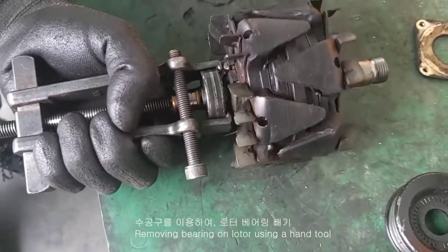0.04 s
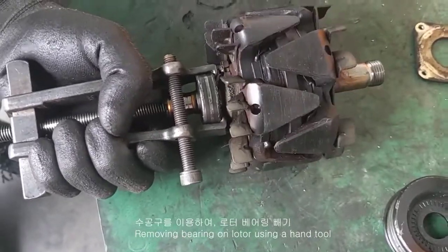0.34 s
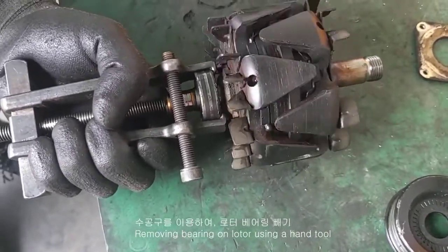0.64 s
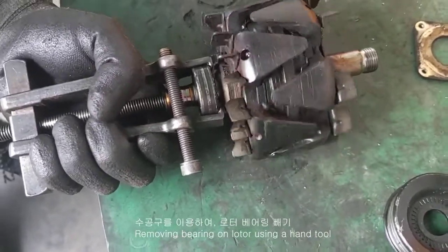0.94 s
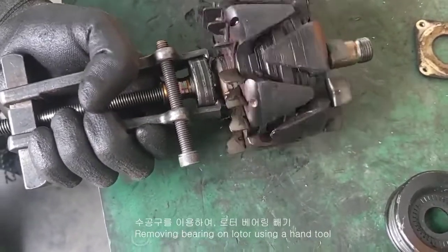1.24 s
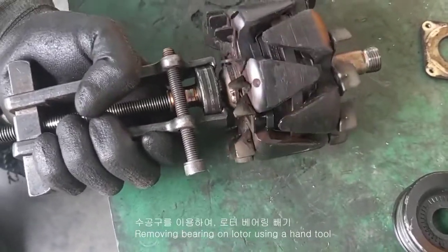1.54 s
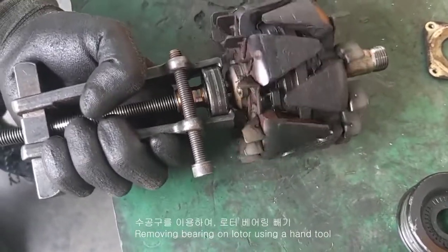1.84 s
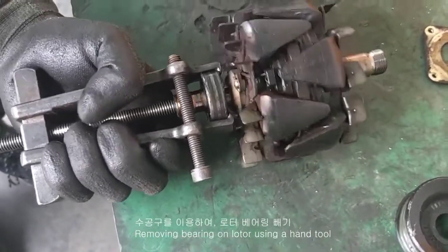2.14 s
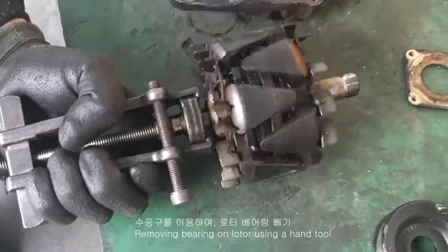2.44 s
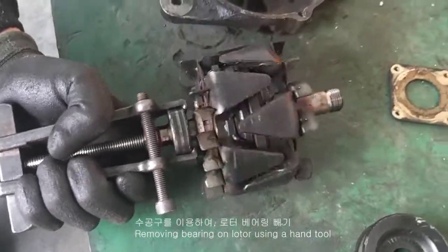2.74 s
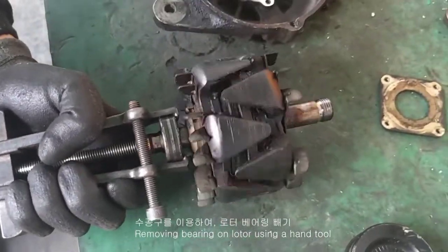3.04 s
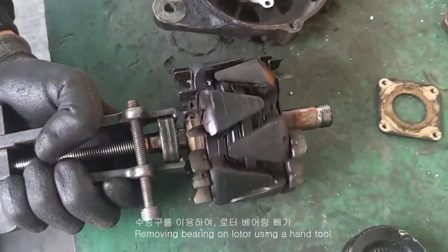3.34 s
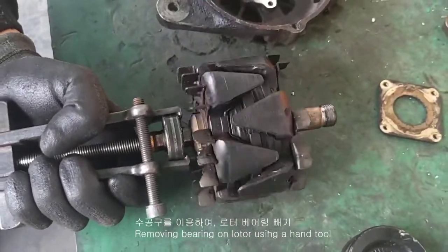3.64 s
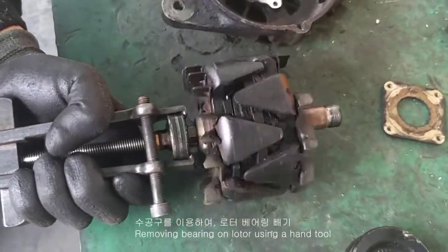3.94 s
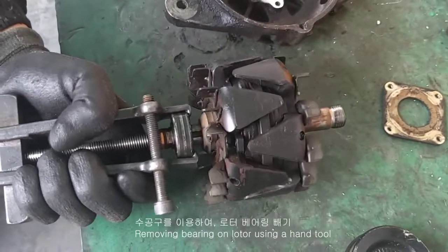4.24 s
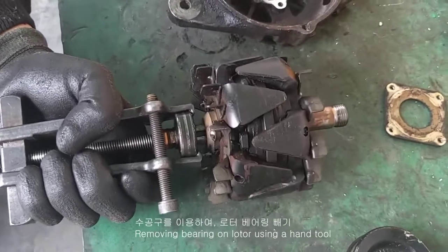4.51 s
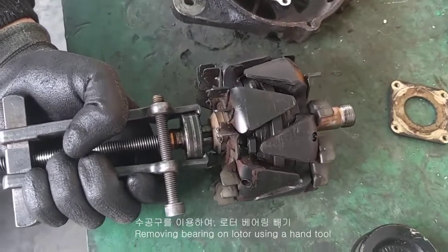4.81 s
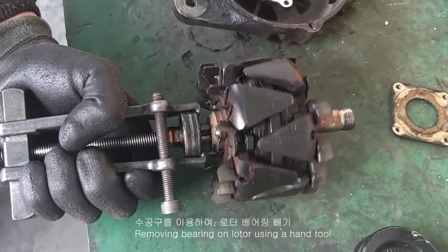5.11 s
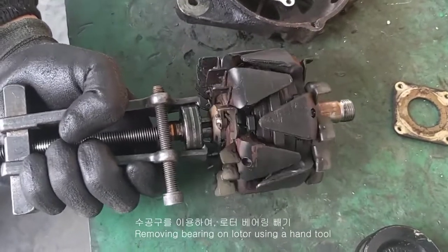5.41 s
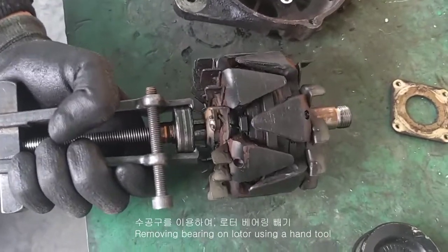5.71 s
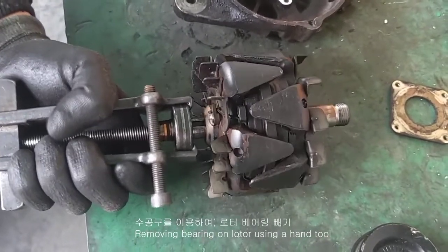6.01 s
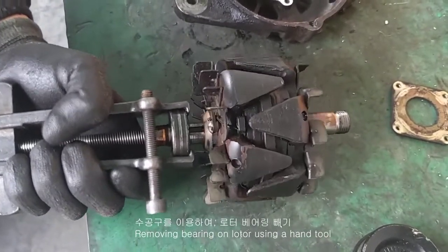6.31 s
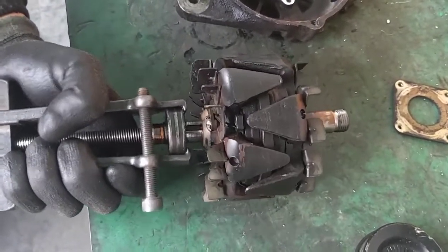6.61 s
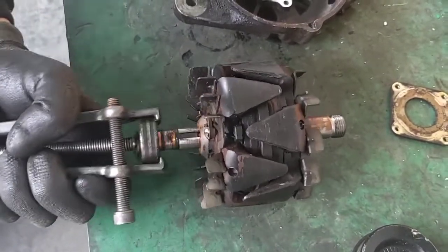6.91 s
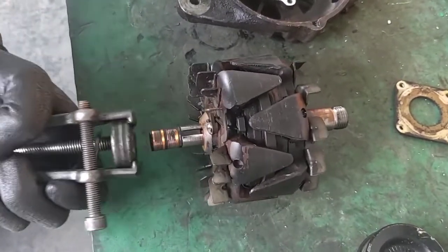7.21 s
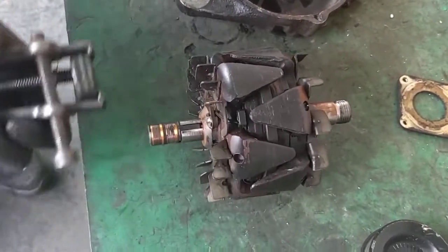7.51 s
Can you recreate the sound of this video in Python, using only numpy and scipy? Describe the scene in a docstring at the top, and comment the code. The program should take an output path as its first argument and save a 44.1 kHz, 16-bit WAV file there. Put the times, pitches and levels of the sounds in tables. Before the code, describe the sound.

Short spitting blasts of air from a tool driving a bearing puller come in two fast runs, ending with a faint puff and soft clinks.

```python
"""An air tool spins the screw of a bearing puller in short trigger pulls, over the hum of a workshop.
In each pull the valve leaks, pops open, lets out a harsh rush of air that spits now and then, and
bleeds off. The first pulls blow across the microphone, until the tool turns away. Past halfway a sharp,
bright click ends a lingering hiss; after a pause a second run of pulls frees the bearing. A last faint
puff escapes, the puller clinks softly, and glove and sleeve rustle as it is carried off."""
import sys
import numpy as np
from scipy import signal
from scipy.fft import rfft, irfft, next_fast_len
from scipy.io import wavfile
from scipy.ndimage import uniform_filter1d, minimum_filter1d, map_coordinates

SR = 44100
rng = np.random.default_rng(int(sys.argv[2]) if len(sys.argv) > 2 else 0)


def wav_record(signal):
    """Record a signal, one row per channel, as 16-bit PCM in the file named by sys.argv[1]."""
    frames = np.transpose(np.atleast_2d(signal))
    bounded = np.clip(frames, -1, 1)
    # unit amplitude maps onto the largest positive 16-bit level
    quanta = np.round(bounded * 32767).astype(np.int16)
    wavfile.write(sys.argv[1], SR, quanta)


N = 342216
T = np.arange(N) / SR

# trigger pulls: valve pops open t/s, valve shuts t/s, pop level/dB, bleed level/dB
PULLS = [(-.18, -.008, -13, -34), (.109, .253, -18, -41), (.3645, .501, -5.5, -42), (.600, .730, -14, -41),
         (.840, .980, -14, -41), (1.076, 1.238, -13, -40), (1.353, 1.506, -7.5, -40),
         (1.611, 1.767, -19, -33), (1.862, 2.012, -16, -34), (2.131, 2.360, -12, -38),
         (2.465, 2.670, -13.5, -34), (2.772, 2.959, -7.5, -39), (3.053, 3.233, -4.5, -34),
         (3.323, 3.510, -14.5, -41), (3.600, 3.812, -14, -38), (3.913, 4.112, -8.5, -39),
         (4.219, 4.370, -11, -38), (5.051, 5.139, -12, -42), (5.256, 5.417, -13, -38),
         (5.484, 5.817, -19, -39), (5.923, 6.153, -10, -39), (6.238, 6.443, -11, -34),
         (6.541, 6.728, -17, -35), (6.803, 6.891, -13, -35)]
# the valve once fails to seat and hisses on: t/s, level/dB
DRIBBLE = [(4.33, -100), (4.372, -35.5), (4.45, -44), (4.55, -100)]
USUAL_POP_DB, USUAL_BLEED_DB = -13, -38
LEAK_S, LEAK_S_PER_DB = .0175, .001  # a valve that sticks and leaks longer pops harder
LEAK_SHARE, POP_SHARE = .26, .47  # share of full flow just before and just after the pop
JET_DB, FULL_PULL_S, STARVED_DB = -17.3, .135, -8.5  # shorter pulls never reach full pressure
BLEED_S, BLEED_S_PER_DB = .023, .0018  # more air left in the hose bleeds for longer

def valve(opening_s=.028, closing_s=.049, lag_s=.01, bleed_fall_s=.012, port_spread_db=.8):
    """Each pull leaks, pops open and eases shut: envelopes for jet, housing, port and bleed."""
    jet, housing, port, bleed = np.zeros((4, N))
    for (pop, stop, pop_db, bleed_db), chance in zip(PULLS, rng.standard_normal(len(PULLS))):
        start = pop - LEAK_S - LEAK_S_PER_DB * (pop_db - USUAL_POP_DB)
        bleed_s = BLEED_S + BLEED_S_PER_DB * (bleed_db - USUAL_BLEED_DB)
        db = JET_DB + STARVED_DB * max(0, 1 - (stop - pop) / FULL_PULL_S)
        active = (T > start) & (T < stop + .2)
        t = T[active]
        leaking = np.interp(t, [start, pop], [0, LEAK_SHARE])
        opened = np.where(t < pop, leaking, np.interp(t, [pop, pop + opening_s], [POP_SHARE, 1]))
        flow = opened * ease((stop + lag_s - t) / closing_s)
        jet[active] += amp(db) * flow
        housing[active] += amp(db) * flow ** 2  # needs a full flow
        port[active] += amp(db + port_spread_db * chance) * flow ** .5  # speaks when barely open
        bleed[active] += amp(bleed_db) * opened / (1 + np.exp((t - stop - bleed_s) / bleed_fall_s))
    return jet, housing, port, bleed + level(DRIBBLE)


def air_tool():
    """One valve drives all the layers of the exhaust."""
    jet, housing, port, bleed = valve()
    return jet_roar(jet) + housing_ring(housing) + port_ring(port, bleed) + draught(jet) + hose(bleed)


# harsh, broad colour of the jet: f/Hz, level/dB
JET_EQ = [(30, -8), (120, -.5), (750, -1), (1300, -1.5), (2000, -0.5), (3300, 1), (4300, -0.54),
          (5500, -4.5), (8700, -4.5), (10800, -6.5), (12700, -5), (13900, -14.5), (14700, -6.5),
          (15500, -31)]

def jet_roar(jet):
    """The turbulent jet roars with a fast sputter."""
    sputter = amp(.45 * wobble(60) + .35 * wobble(300))
    return jet * eddies(rush(JET_EQ), patchy_db=2.1) * sputter


# hollow resonances of the housing: f/Hz, half-width/Hz, level/dB
HOUSING_MODES = [(816, 130, -1.5), (1162, 300, 5.5), (1960, 280, -9)]
# their fader, relative to the jet: t/s, level/dB
HOUSING_FADER = [(.1, -26), (.65, -13.5), (1.4, -10.5), (2.5, -15), (3.05, -21), (4.3, -15.5), (5.6, -12.5),
                 (6.35, -17), (6.83, -4.5)]

def housing_ring(drive):
    """Air rushing through the housing gives it a hollow, fluttering ring."""
    return drive * level(HOUSING_FADER) * blown(HOUSING_MODES) * amp(1.05 * wobble(60))


# resonances of the exhaust port: f/Hz, half-width/Hz, level/dB
PORT_MODES = [(2683, 110, 9), (2620, 430, 0), (3450, 250, -9)]
# fader on the jet's drive to the port: t/s, level/dB
PORT_FADER = [(0, -15.5), (2.5, -14), (3.1, -10.5), (3.7, -9), (5.6, -10.5), (6.5, -11.5), (6.8, -7.5)]

def port_ring(drive, bleed):
    """The exhaust port rings under the jet and faintly under the bleeding air."""
    ring = blown(PORT_MODES) * amp(-1 + 1.3 * wobble(30))
    return (drive * level(PORT_FADER) + amp(-15.5) * bleed) * ring


# the draught fades as the tool turns away: t/s, level/dB
DRAUGHT_FADER = [(0, -8), (.2, -11.5), (.45, -11), (.65, -9.5), (.9, -11), (1.15, -12), (1.4, -26.5),
                 (1.9, -34), (7.7, -66)]
# low colour of wind on the microphone: f/Hz, level/dB
BUFFET_EQ = [(30, -8), (100, -10), (220, -5.5), (340, 0.5), (480, 0), (620, -1.5), (800, -18), (1600, -45),
             (4000, -80)]
# edge whistles in the draught: f/Hz, half-width/Hz, level/dB
EDGE_MODES = [(8970, 220, 10), (12200, 300, -4), (15000, 700, 0)]

def draught(jet):
    """The exhaust blows across the microphone, buffeting and whistling."""
    buffet = amp(7) * rush(BUFFET_EQ) * amp(2.3 * wobble(69.6))
    whistles = amp(-3.5) * blown(EDGE_MODES)
    return jet * level(DRAUGHT_FADER) * (buffet + whistles)


# loud spits in mid-stream: t/s, crack level/dB, thump level/dB
LOUD_SPITS = [(.128, -20, -11), (2.646, -6.5, -14), (3.667, -8.5, -7), (3.685, -5, -11), (5.093, -3.5, -10),
              (6.828, -10, -8)]
POP_THUMP_DB, THUMP_DB_PER_DB = -25, 2.6  # thump of a usual pop; its growth with the crack

def spit_cues(count=2, mean_gap_s=.018, small_db=-19, spread_db=2.5):
    """Valve pops, small spits after them and the loud spits, in the columns of LOUD_SPITS."""
    cracks = []
    for pop, stop, pop_db, _ in PULLS:
        times = pop + np.cumsum(rng.exponential(mean_gap_s, count))
        levels_db = rng.normal(small_db, spread_db, count)
        cracks += [(pop, pop_db)] + [(s, db) for s, db in zip(times, levels_db) if s < stop]
    cues = [(s, db, POP_THUMP_DB + THUMP_DB_PER_DB * (db - USUAL_POP_DB)) for s, db in cracks if s > 0]
    return cues + list(LOUD_SPITS)


# bright snap of a spit: f/Hz, level/dB
CRACK_EQ = [(50, -8), (400, -4.5), (900, -3.5), (2700, 3.5), (5000, -0.5), (10000, -3), (15000, -9)]
# its low punch: f/Hz, level/dB
THUMP_EQ = [(40, -11), (150, -3), (420, 4), (700, 2), (1300, -5.5), (2500, -20), (8000, -49)]

def spits():
    """Slugs of air crack out, ring the port and thump the microphone."""
    times, crack_db, thump_db = np.transpose(spit_cues())
    crack_tone = rush(CRACK_EQ) + amp(-1.5) * blown(PORT_MODES)
    crack = strikes(times, crack_db, attack=.0014, t60=.0083) * crack_tone
    thump = strikes(times, thump_db, attack=.0012, t60=.013) * rush(THUMP_EQ)
    push = 1 + amp(9) * level(DRAUGHT_FADER)  # slugs that ride the draught thump harder
    return amp(6) * crack + amp(-1) * thump * push


# soft hiss of bleeding air: f/Hz, level/dB
BLEED_EQ = [(40, -20), (220, -4), (450, -25), (800, -10.5), (1800, -4), (2750, 2), (4000, -1), (6000, -7.5),
            (9500, -10), (12500, -14), (15500, -21)]

def hose(bleed):
    """Air left in the hose hisses away."""
    return bleed * rush(BLEED_EQ)


# envelope of the last puff: t/s, level/dB
PUFF_FADER = [(7.055, -80), (7.068, -52), (7.078, -39.5), (7.16, -37.5), (7.2, -40.5), (7.238, -40),
              (7.26, -51), (7.31, -79)]
# its thin whistle, relative to the puff: t/s, level/dB
WHISTLE_FADER = [(7.07, -24), (7.145, -26), (7.165, 1), (7.2, -8), (7.25, -24)]

def last_puff():
    """A barely opened valve hisses, rings the port and whistles for a moment."""
    hiss = eddies(rush(BLEED_EQ), patchy_db=1.0)
    ring = amp(-11) * blown(PORT_MODES)
    whistle = level(WHISTLE_FADER) * blown([(7000, 80, 0)])
    return level(PUFF_FADER) * (hiss + ring + whistle)


# sharp clicks and soft clinks: t/s, click level/dB, bench thud level/dB
CLICKS = [(4.444, -24.5, -59), (7.478, -43, -68), (7.495, -44, -78)]
# their bright colour: f/Hz, level/dB
CLICK_EQ = [(100, -15), (1000, -9), (3200, 3.5), (6000, -2), (15000, -12)]

def clicks(bench_hz=138):
    """One sharp, bright click and later two soft clinks; the bench hums under each."""
    times, click_db, thud_db = np.transpose(CLICKS)
    snap = strikes(times, click_db, attack=.0003, t60=.04) * rush(CLICK_EQ)
    hum = np.sin(2 * np.pi * bench_hz * T + .5 * wobble(14))
    bench = strikes(times, thud_db, attack=.003, t60=1.9) * hum
    return snap + amp(2.5) * bench


# swell of the closing rustle: t/s, level/dB
RUSTLE_FADER = [(7.58, -75), (7.63, -50.5), (7.69, -44), (7.76, -39.5)]
# dull colour of cloth: f/Hz, level/dB
CLOTH_EQ = [(30, 6), (55, 10), (90, 6), (180, 6), (450, 4), (800, 3), (1600, -1), (3000, -9), (6000, -15),
            (10000, -19), (15500, -28)]

def rustle():
    """Glove and sleeve rub as they move off."""
    return level(RUSTLE_FADER) * rush(CLOTH_EQ)


# reverb time of the workshop: f/Hz, t60/s
ROOM_DECAY = [(150, 0.38), (1000, 0.1), (3000, 0.35), (12000, 0.21)]

def room(x):
    """The workshop's reverb, each frequency dying at its own speed."""
    hz, t, noise = signal.stft(rng.standard_normal((2, SR // 2)), SR, nperseg=256)
    decay = amp(-60 * t / along(ROOM_DECAY, hz)[:, None])
    tail = signal.istft(noise * decay, SR, nperseg=256)[1]
    return signal.fftconvolve(x, tail / np.linalg.norm(tail[0]), axes=1)[:, :N]


# colour of the room tone: f/Hz, level/dB
SHOP_EQ = [(25, -15), (100, -7), (210, 0.5), (450, -1), (800, 0), (1200, -2), (2000, -8), (3000, -10.5),
           (5000, -15.5), (8200, -18), (8700, -12.5), (9300, -20.5), (12500, -26.5), (15500, -29)]
# its nearly flat fader: t/s, level/dB
SHOP_FADER = [(0, -49.5), (4.6, -51.5), (5, -51), (7, -51), (7.35, -52), (7.76, -52)]

def shop_hum():
    """A low, gently wavering bed of workshop noise."""
    return level(SHOP_FADER) * amp(.54 * wobble(5)) * eddies(rush(SHOP_EQ), patchy_db=2.5)


def amp(db):
    """Decibels to gain."""
    return 10 ** (np.asarray(db) / 20)


def unit(x):
    """Scale to rms 1."""
    return x / np.sqrt(np.mean(x ** 2) + 1e-20)


def along(points, hz):
    """Read (f/Hz, value) points on a log frequency axis."""
    f, v = np.transpose(points)
    return np.interp(np.log(hz + 1), np.log(f + 1), v)


def level(fader):
    """A (t/s, level/dB) fader as a gain per sample."""
    return amp(np.interp(T, *np.transpose(fader)))


def wobble(rate):
    """A smooth random curve, rate knots a second."""
    return map_coordinates(rng.standard_normal(int(N * rate / SR) + 4), [T * rate])


def ease(u):
    """A smooth step from 0 to 1."""
    return np.sin(np.pi / 2 * np.clip(u, 0, 1)) ** 2


def filtered(x, response):
    """Shape x with a gain given as a function of frequency."""
    size = next_fast_len(N + SR // 4)
    return irfft(rfft(x, size) * response(np.fft.rfftfreq(size, 1 / SR)), size)[..., :N]


def rush(eq):
    """Wide stereo noise of this colour, rms 1."""
    return unit(filtered(rng.standard_normal((2, N)), lambda hz: amp(along(eq, hz))))


def blown(modes):
    """Turbulence ringing in a few resonances, rms 1."""
    response = lambda f: sum(amp(db) / (1 + ((f - hz) / (width + 1)) ** 2) for hz, width, db in modes)
    return unit(filtered(rng.standard_normal((2, N)), response))


def eddies(x, patchy_db):
    """Eddies lift and sink patches of the spectrum."""
    spectrum = signal.stft(x, nperseg=512)[2]
    patches = uniform_filter1d(rng.standard_normal(spectrum.shape[1:]), size=7, axis=0)
    patches = uniform_filter1d(patches, size=7, axis=1)
    return unit(signal.istft(spectrum * amp(patchy_db * unit(patches)), nperseg=512)[1][:, :N])


def strikes(times, levels_db, attack, t60):
    """Summed envelopes of hits that rise fast and die away; times in seconds."""
    out, t = np.zeros(N), np.arange(int(2 * t60 * SR)) / SR
    shape = (1 - np.exp(-t / attack)) * amp(-60 * t / t60)
    for s, db in zip(times, levels_db):
        first = round(s * SR)
        out[first:first + len(t)] += amp(db) * shape[:N - first]
    return out


def lagged(x, seconds):
    """One-pole smoothing with this time constant."""
    keep = np.exp(-1 / (seconds * SR))
    return signal.lfilter([1 - keep], [1, -keep], x)


def limiter(x, ceiling_db, reaction_s, hold_samples):
    """The gain ducks near the ceiling and holds a moment: a crack slips through and leaves a dip."""
    power = lagged(np.mean(x ** 2, axis=0), reaction_s)
    gain = (1 + (power / amp(ceiling_db) ** 2) ** 2) ** (-1 / 4)
    held = minimum_filter1d(gain, hold_samples, origin=(hold_samples - 1) // 2)
    return x * lagged(held, reaction_s)


def scene():
    """Tool and puller up close with a touch of reverb, over the hum of the shop."""
    work = air_tool() + last_puff() + spits() + clicks() + rustle()
    shop = shop_hum()
    return work + amp(-21) * room(work) + shop


# thin colour of the microphone: f/Hz, level/dB
MIC_EQ = [(20, -19), (45, -14.5), (95, -10), (590, -10), (740, -1), (5600, 0), (7100, -6), (8500, -1)]

def record(dry):
    """Microphone colour, a fast limiter and a brick-wall high cut."""
    coloured = filtered(dry, lambda hz: amp(along(MIC_EQ, hz)))
    limited = limiter(coloured, ceiling_db=-14.5, reaction_s=.0012, hold_samples=601)
    return filtered(limited, lambda hz: hz < 15500)


dry = scene()
out = record(dry)
wav_record(out)
```